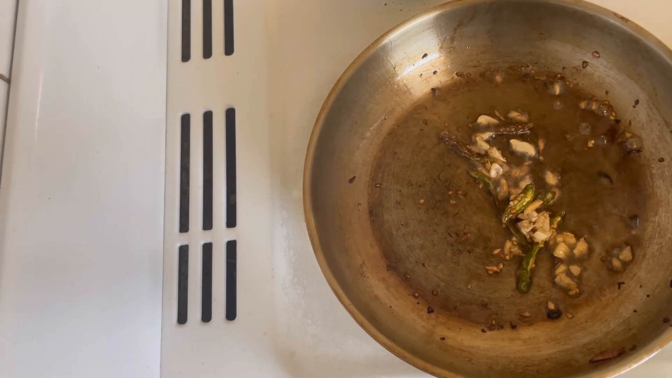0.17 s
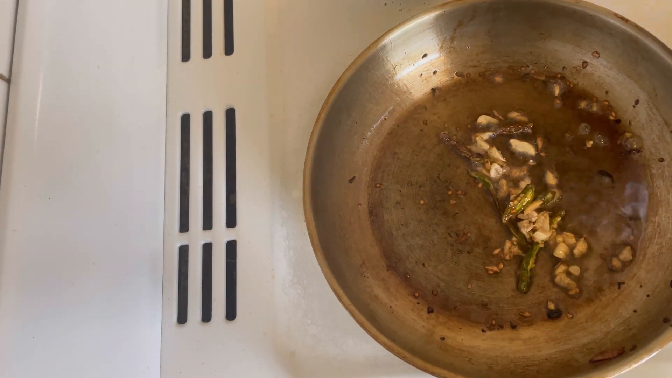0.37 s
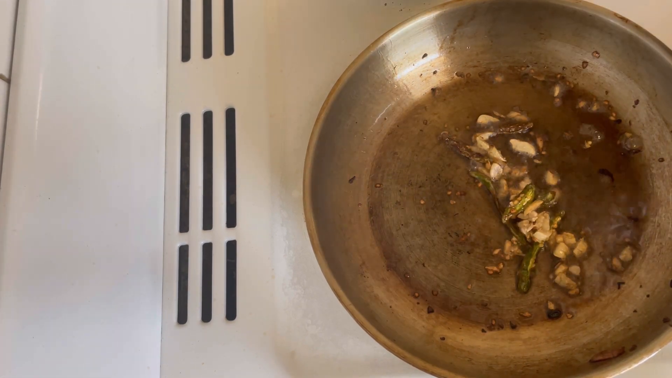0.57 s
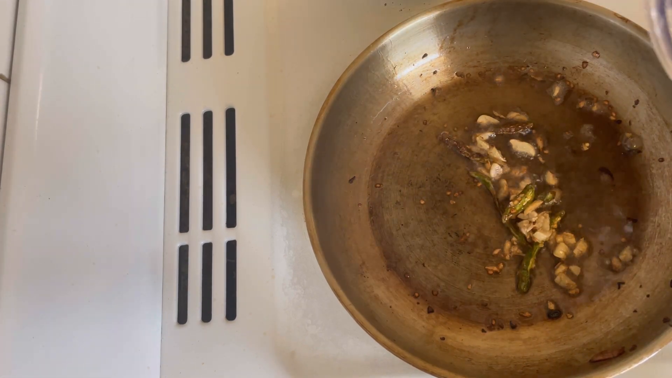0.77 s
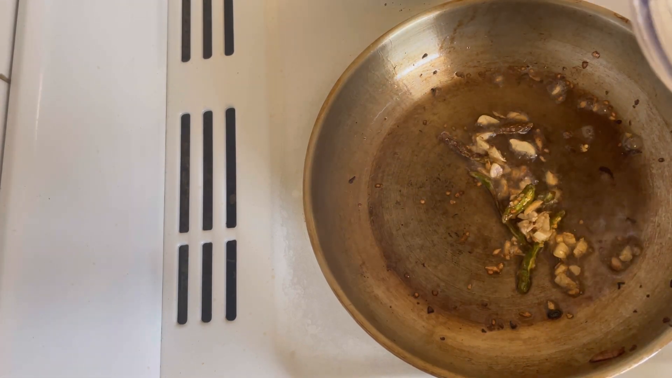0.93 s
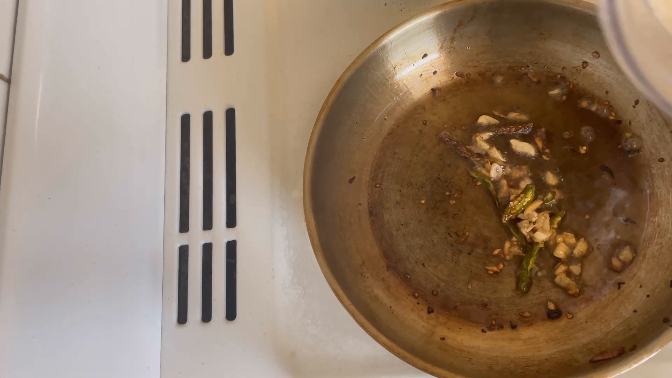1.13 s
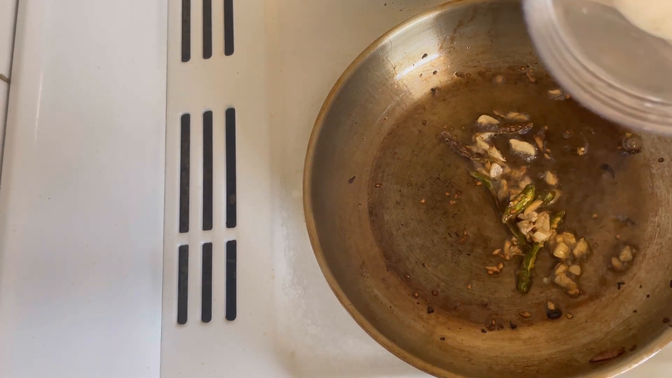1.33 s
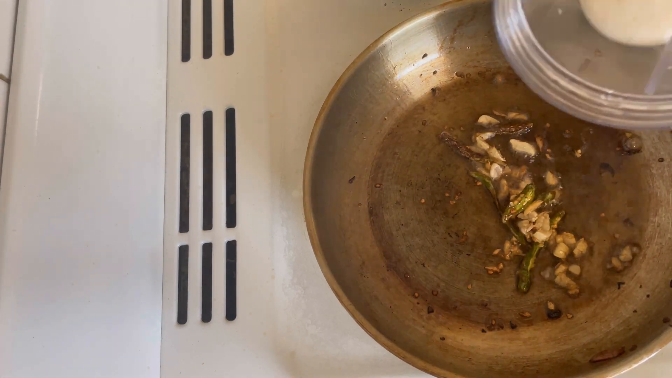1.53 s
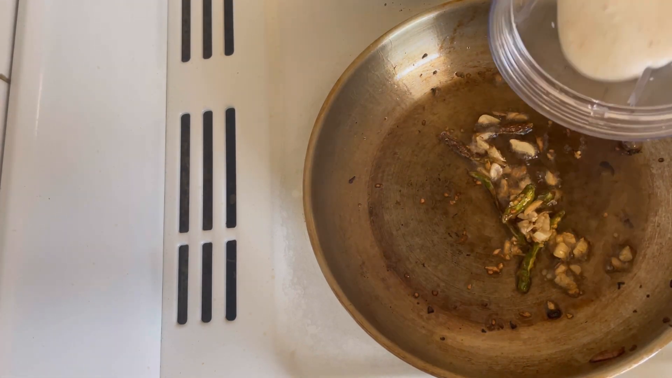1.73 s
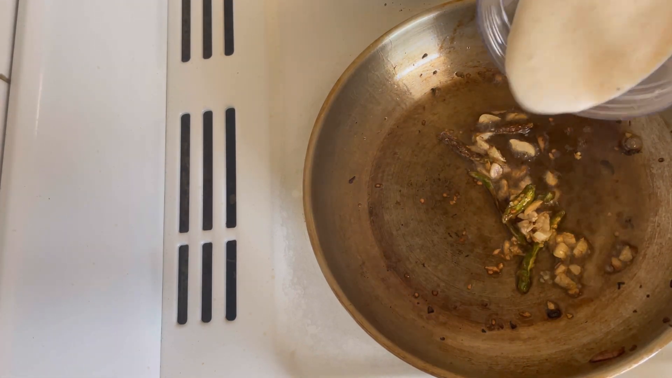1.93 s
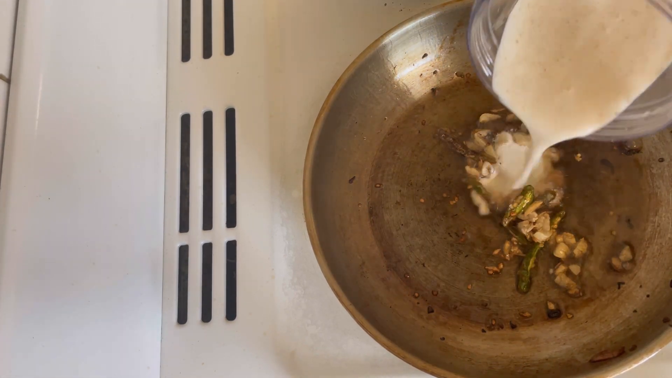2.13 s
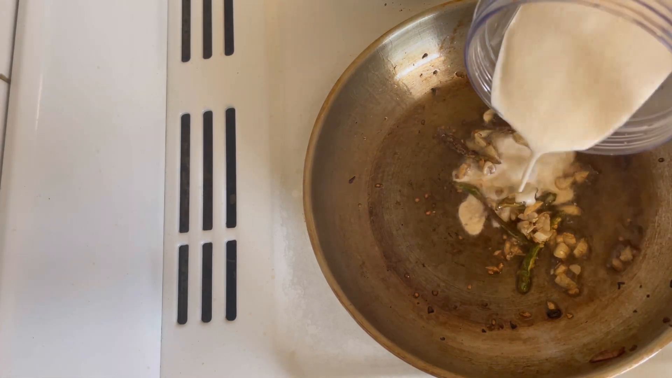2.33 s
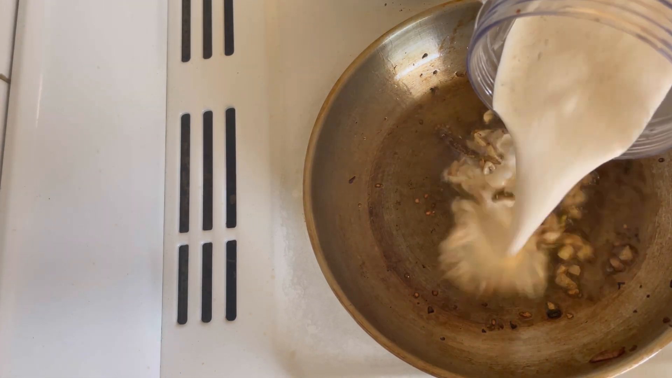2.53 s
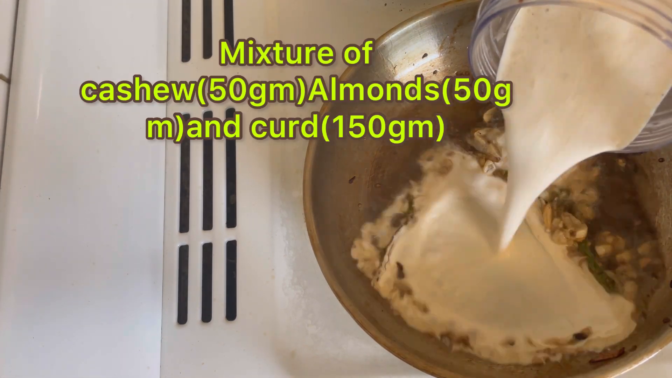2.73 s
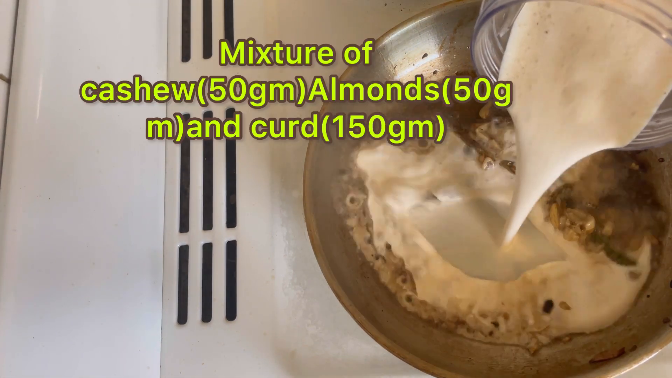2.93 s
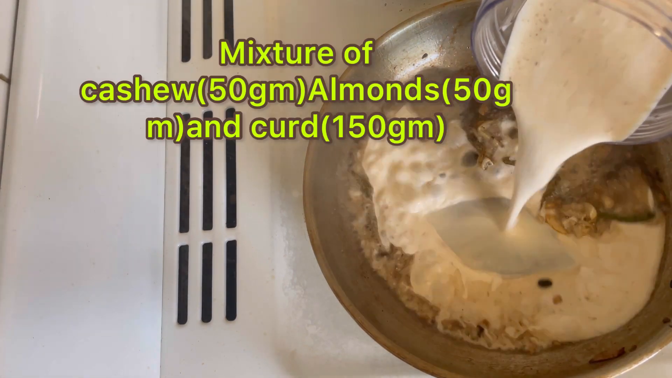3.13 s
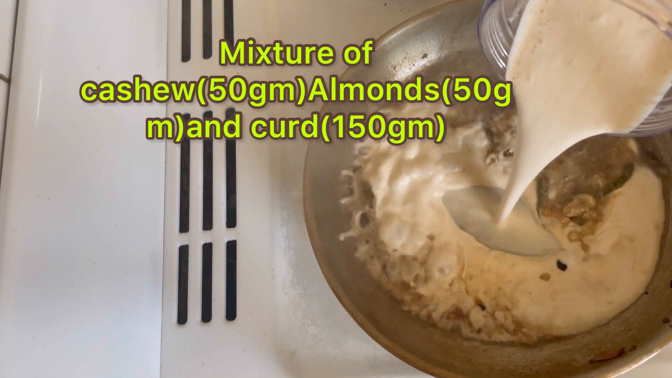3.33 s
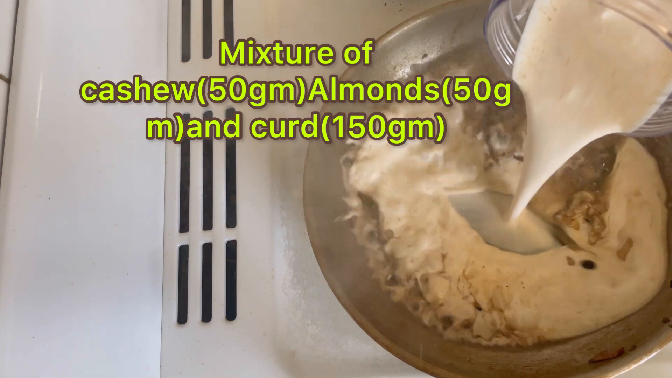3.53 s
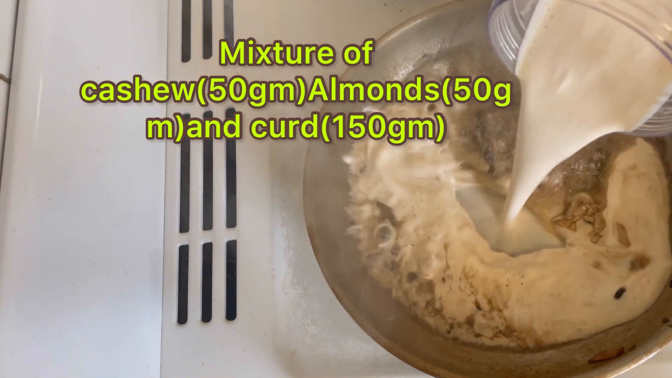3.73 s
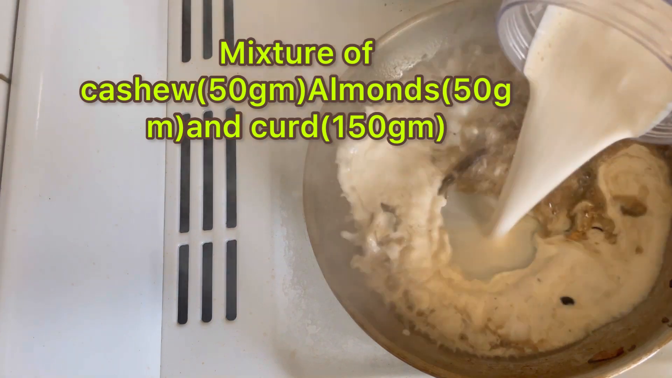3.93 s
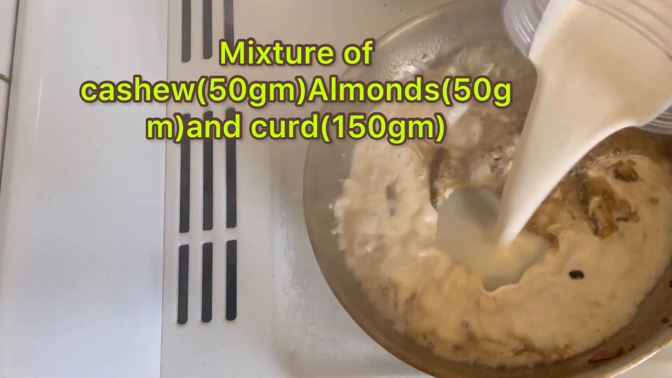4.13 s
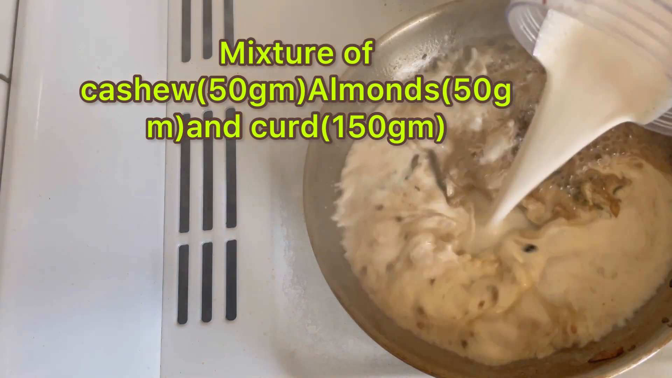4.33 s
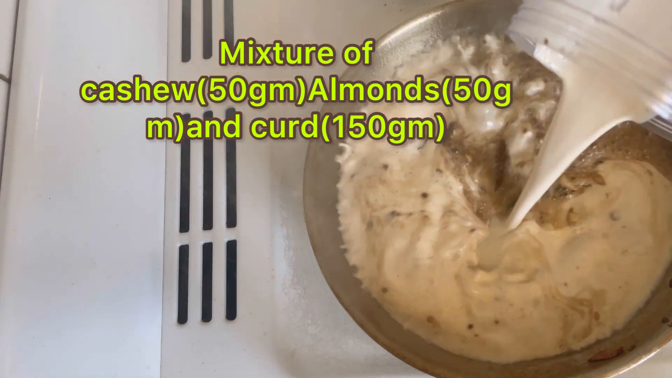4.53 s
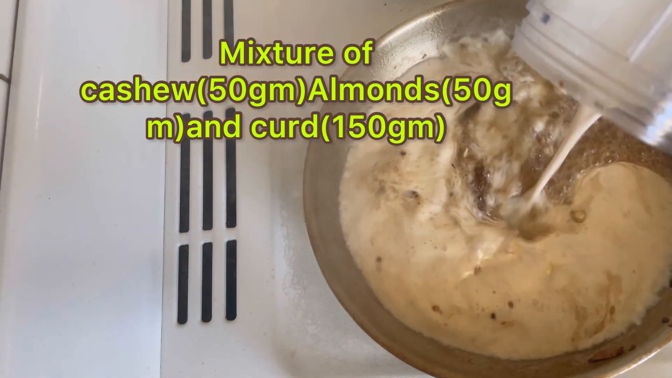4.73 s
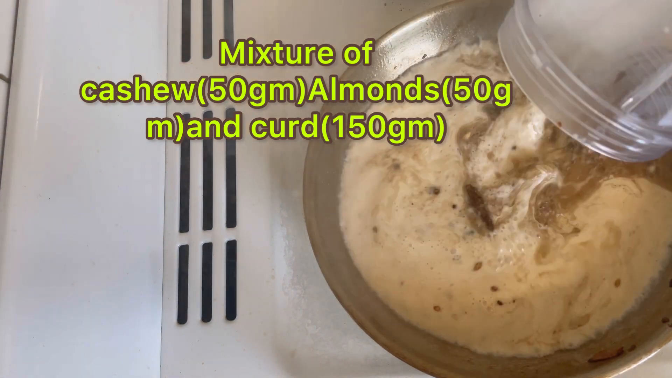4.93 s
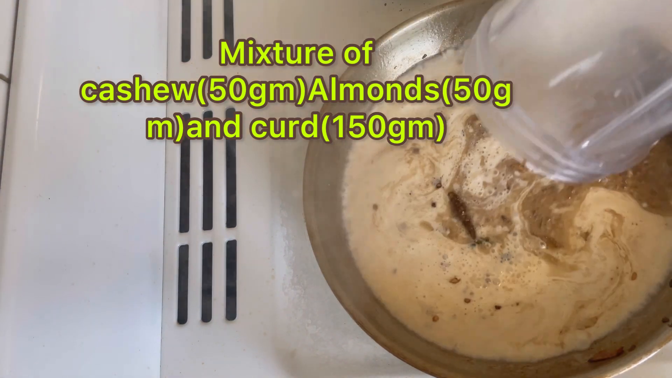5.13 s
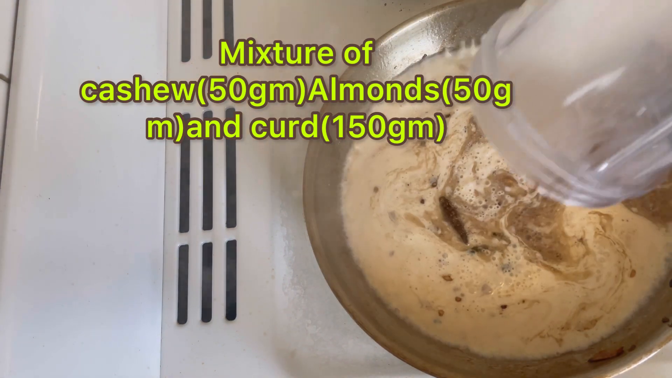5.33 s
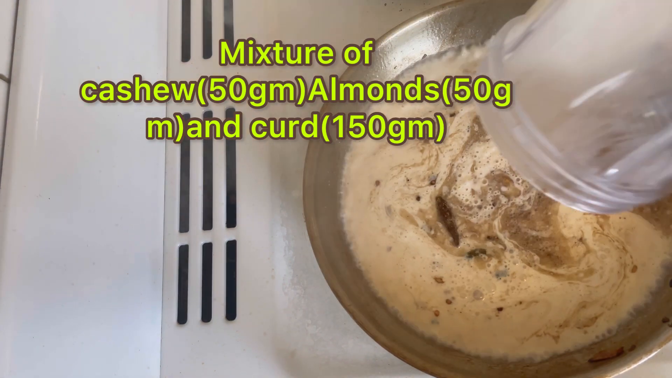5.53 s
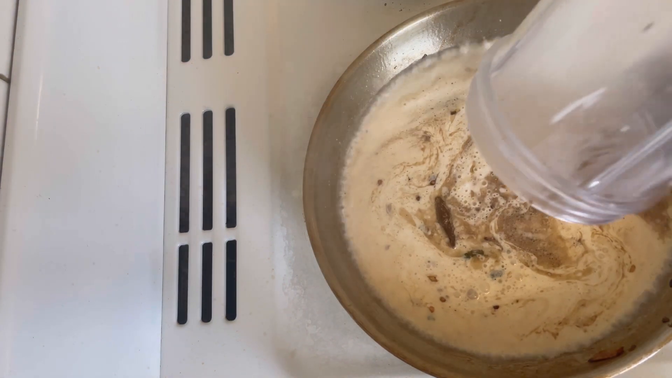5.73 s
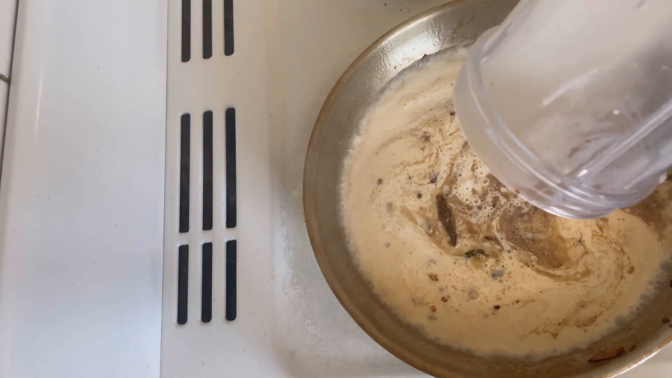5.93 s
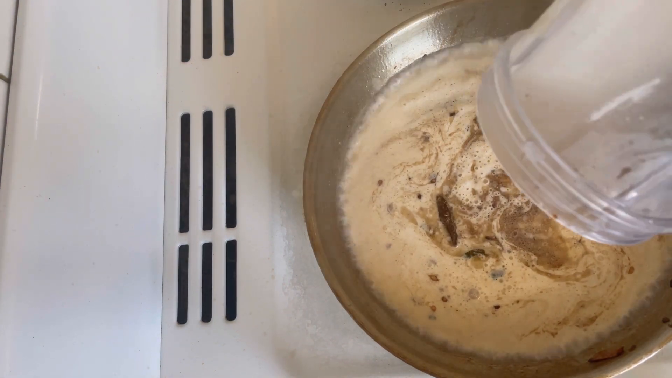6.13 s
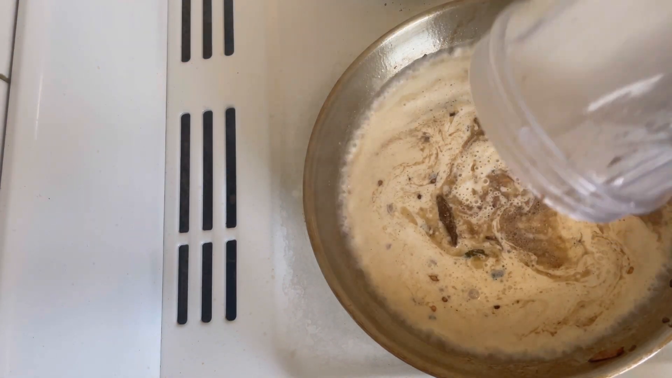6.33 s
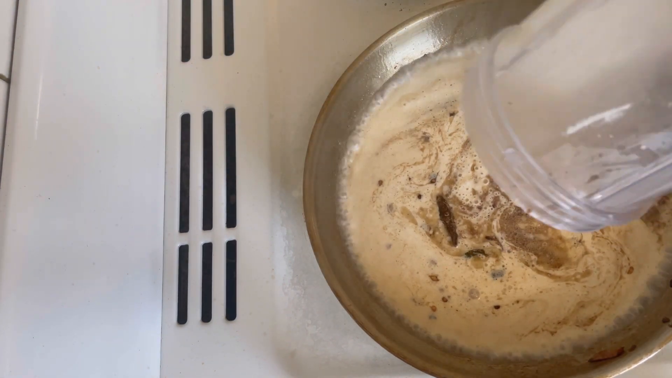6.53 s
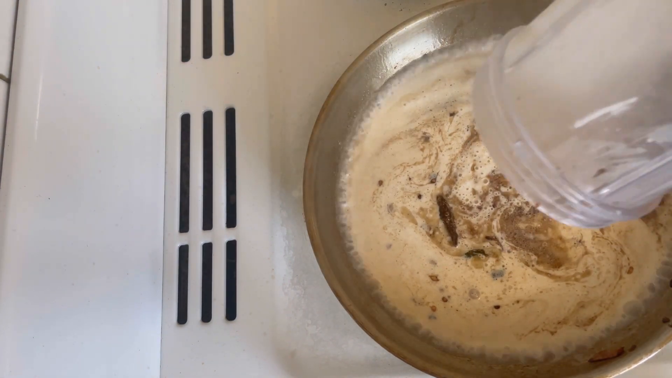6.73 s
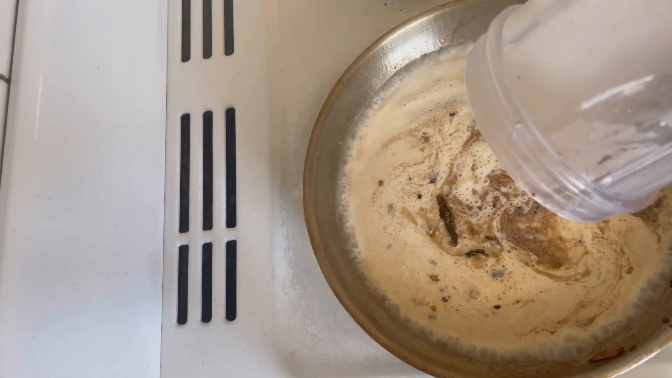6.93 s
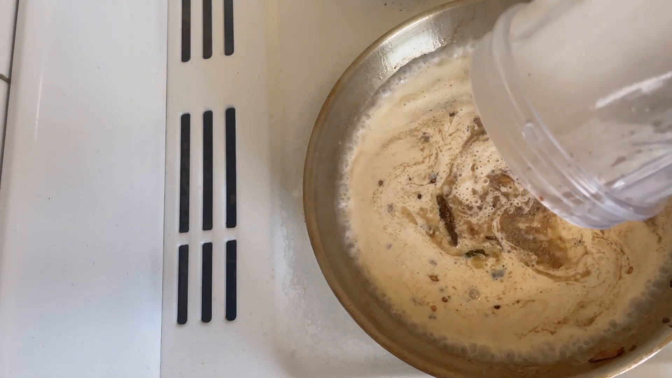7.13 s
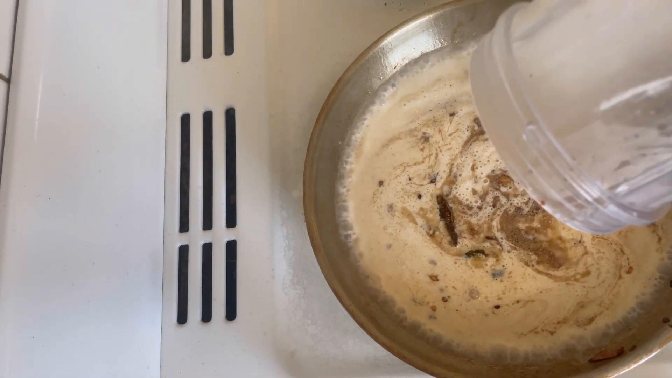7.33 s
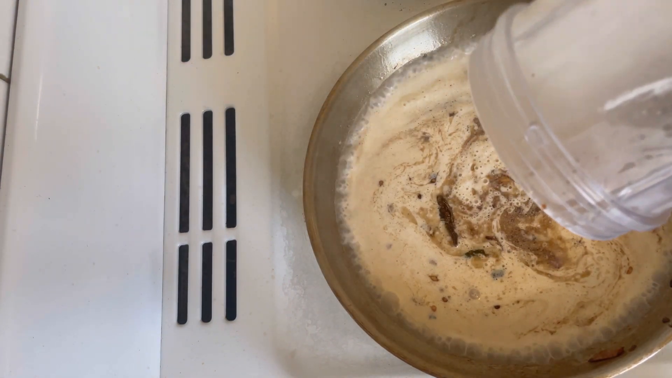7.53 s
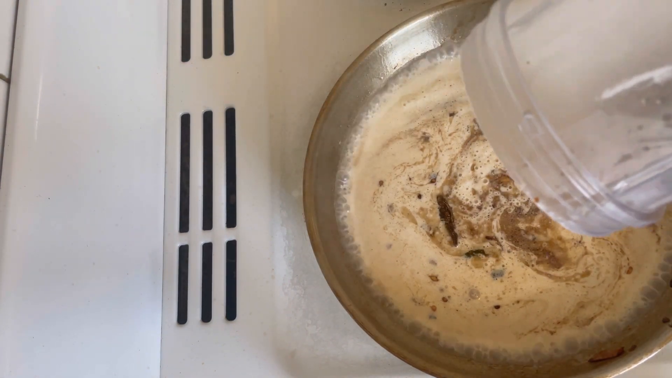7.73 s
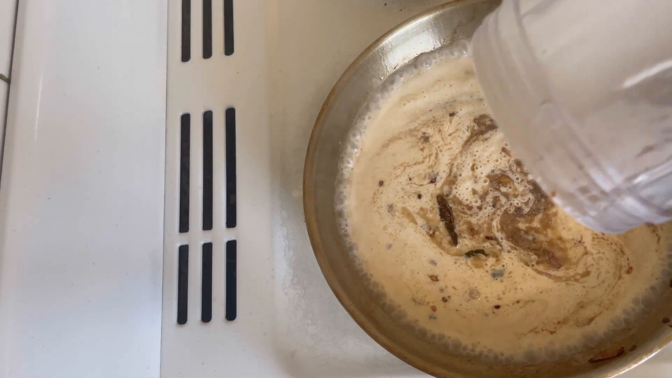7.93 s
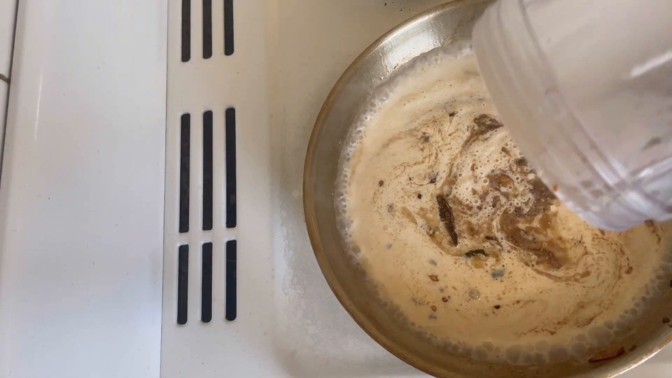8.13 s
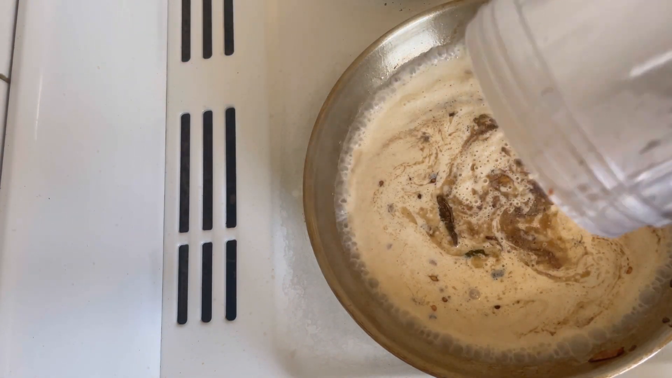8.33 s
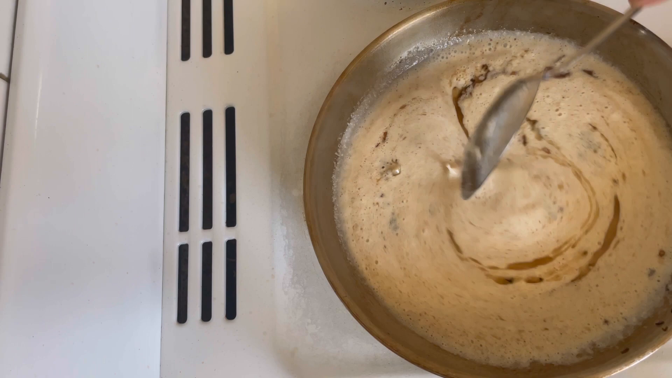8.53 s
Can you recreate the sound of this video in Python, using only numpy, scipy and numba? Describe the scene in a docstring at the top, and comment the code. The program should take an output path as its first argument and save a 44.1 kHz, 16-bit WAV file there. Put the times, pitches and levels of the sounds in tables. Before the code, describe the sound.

Close above a steel pan on a home hob, garlic and chillies fizz quietly in oil with sharp droplet pops and faint plastic jar knocks. Thick nut sauce is poured in: a loud, bright sizzle flares with sputters, squeaks and bubbling blips, then steadily sinks as the pan cools and drops suddenly to faint ticking. Stereo phone microphone, short tiled-room reflections.

```python
"""A fine fizz of garlic and chillies frying in hot oil in a steel pan, with single water droplets bursting in
it. A thick sauce is poured in from a plastic jar: steam bubbles flare into a loud sizzle that sinks as the pan
cools; then the scene changes abruptly to a faint simmer. A phone with two microphone ports is held above the
hob. Bubbles are short dying sine waves in random crowds; droplets, blisters, knocks and thuds are single placed
tones; the pan's resonances colour the crackle, and the kitchen answers with short reflections."""
import sys
import numpy as np
from scipy import signal
from scipy.fft import rfft, irfft, next_fast_len
from scipy.io import wavfile
from scipy.ndimage import uniform_filter1d
from numba import njit

SR = 44100
rng = np.random.default_rng(int(sys.argv[2]) if len(sys.argv) > 2 else 0)


def master(y):
    """Save y as 16-bit WAV."""
    cut = np.clip(np.atleast_2d(y).T, -1, 1)
    pcm = np.round(cut * 32767)  # scale
    wavfile.write(sys.argv[1], SR, pcm.astype(np.int16))


N = 378819

SAUCE_START_S, SAUCE_END_S = 2.075, 8.375
TOP_HZ = 15800  # the phone keeps nothing much above this
FFT_SIZE = next_fast_len(N + 4096, real=True)
T = np.arange(N) / SR  # time, s
FREQ = np.fft.rfftfreq(FFT_SIZE, 1 / SR)  # Hz


def undb(db):
    """Amplitude factor for a level in dB."""
    return 10 ** (np.asarray(db) / 20)


def curves(table):
    """The columns of a table, joined by straight lines in time."""
    s, *columns = np.transpose(table)
    return [np.interp(T, s, c) for c in columns]


def shape(x, gain):
    """Filter by a gain for each frequency."""
    return irfft(rfft(x, FFT_SIZE) * gain, FFT_SIZE)[..., :N]


def colour(points):
    """Gain for each frequency from (Hz, dB) points, joined along log frequency."""
    hz, db = np.transpose(points)
    return undb(np.interp(np.log(FREQ + 1), np.log(hz), db))


def band(lo_hz, hi_hz):
    """Gain of a band with soft edges."""
    low_edge = 1 + (lo_hz / (FREQ + 1)) ** 10
    high_edge = 1 + (FREQ / hi_hz) ** 10
    return 1 / np.sqrt(low_edge * high_edge)


def unit(gain):
    """Scale a gain so that it keeps the power of white noise."""
    return gain / np.sqrt(np.mean(gain ** 2))


def resonance_db(hz, width_hz, lift_db):
    """Lift in dB of one resonance, falling to half at half its width to either side."""
    return lift_db / (1 + (2 * (FREQ - hz) / width_hz) ** 2)


def pan_ring():
    """Gain of the resonances of the pan and the space over the hob."""
    # resonances: pitch_hz, width_hz, lift_db
    pan_modes = [(118, 14, 4), (208.6, 48, 7), (288, 30, 5), (425.4, 26, 5.5), (467, 17, 3.5), (610, 32, 6),
                 (682, 28, 6.5), (843, 36, 7), (1058, 16, 4), (1131, 40, 3.5), (1240, 70, 2),
                 (1420, 150, 3), (1700, 35, 2), (1890, 90, 2.5), (2130, 50, 2), (2242, 90, 4.5),
                 (2487, 50, 4.2), (2777, 110, 5.5), (2890, 60, 2.5), (3310, 50, 3.5), (3745, 130, 3),
                 (3940, 70, 2), (4348, 22, 4), (4550, 70, 2), (4990, 90, 2.5), (5099, 45, 2),
                 (5769, 90, 2.5)]
    return undb(sum(resonance_db(hz, width_hz, db) for hz, width_hz, db in pan_modes))


def hollow(fill):
    """Gain of the broad resonances of the air in the pan, which rise as it fills (0-1)."""
    # air resonances: empty_hz, full_hz, width_hz, lift_db
    air_modes = [(1090, 1420, 330, 3.5), (2680, 2830, 300, 1.5), (5040, 5380, 340, 3.5)]
    return undb(sum(resonance_db(empty_hz + fill * (full_hz - empty_hz), width_hz, db)
                    for empty_hz, full_hz, width_hz, db in air_modes))


def walk(per_s, size=N):
    """Random levels, each held briefly and smoothed; spread near 1."""
    hold = int(SR / per_s)
    steps = np.repeat(rng.standard_normal(1000), hold)[:size]
    return 1.2 * uniform_filter1d(steps, hold)


def ports(common, apart):
    """Sound from the pan reaches the ports out of step; at some pitches much of it differs at each port."""
    # the two microphone ports: pitch_hz, left_lead_rad, common_share (0-1 of the power)
    port_table = [(40, 0, .99), (220, -.1, .98), (450, -.5, .92), (740, -.6, .58), (1100, -.25, .92),
                  (1850, 0, .97), (2750, .7, .6), (4350, 1, .55), (4850, -.35, .78), (6600, 2.2, .86),
                  (7500, 3.14, .97), (9500, 4.9, .84), (11000, 6.3, .92), (12600, 7.6, .78),
                  (14300, 9.4, .93), (16000, 10.8, .7)]
    hz, lead_rad, share = np.transpose(port_table)
    share = np.clip(np.interp(FREQ, hz, share), 0, 1)
    # half the lead goes to the left port, half is taken from the right
    turn = np.exp(.5j * np.interp(FREQ, hz, lead_rad) * np.array([[1], [-1]]))
    return shape(common, np.sqrt(share) * turn) + shape(apart, np.sqrt(1 - share))


@njit
def ring(start, pole, size, length):
    """Add up short dying sine waves."""
    out = np.zeros(N)
    for k in range(len(start)):
        z = size[k] + 0j
        for i in range(start[k], min(start[k] + length[k], N)):
            z *= pole[k]
            out[i] += z.imag
    return out


def bubbles(per_s, spread_db, cycles):
    """Steam bubbles burst at random, each a dying tone at its own pitch; an even crackle near rms 1 at both ports."""
    streams = []
    for _ in range(3):  # one stream common to both ports, then one for each
        draws = rng.random((300000, 5))[:int(per_s * N / SR)]
        when, pitch, life, strength, sign = draws.T
        hz = 30 + 17500 * pitch ** 2
        # decay time in samples, at most 5 ms
        decay = np.minimum(max(cycles, .3) * (.25 + life) * SR / hz, SR / 200)
        # a positive spread makes a few bubbles far stronger, a negative one a few far weaker
        size = undb(-spread_db * np.log(strength + .004))
        # the root spreads their energy evenly over pitch
        size = size * np.sqrt(pitch / decay)
        pole = np.exp(2j * np.pi * hz / SR - 1 / decay)
        x = ring((when * N).astype(int), pole, size * np.sign(sign - .5), (4 * decay).astype(int))
        streams.append(x / x.std())
    return ports(streams[0], np.array(streams[1:]))


def bursts(table, rough, waver_hz=0):
    """Each row (s, dB, Hz, swell ms) swells and dies as a short tone, wavering in pitch and roughened by noise."""
    out = np.zeros(N + SR)
    t = np.arange(SR // 5) / SR
    for s, db, hz, swell_ms in table:
        age = t * 1000 / max(swell_ms, .02)  # 1 at the peak of the swell
        turns = np.cumsum(hz + waver_hz * walk(per_s=520, size=len(t))) / SR
        tone = np.sin(2 * np.pi * (turns - turns[0]))
        wave = tone + rough * rng.standard_normal(len(t))
        at = int(s * SR)
        out[at:at + len(t)] += undb(db) * age * np.exp(1 - age) * wave
    return out[:N]


def kitchen(x, near_db, near_t60, room_db, room_t60):
    """Quick reflections off the pan wall and the hob, then the short ring of a tiled room (t60 in s)."""
    t = np.arange(SR // 2) / SR
    tail = 0
    for db, t60 in ((near_db, near_t60), (room_db, room_t60)):
        fade = undb(-60 * t / t60) * (t > .0005)  # nothing returns in the first half millisecond
        fade = fade / np.sqrt(np.sum(fade ** 2))
        tail = tail + undb(db) * fade * rng.standard_normal((2, len(t)))
    return signal.fftconvolve(x[None], tail, axes=1)[:, :N]


def oil():
    """Moisture boils out of the garlic in a fine fizz with sparse, tiny ticks until the sauce covers it."""
    # colour of the bubbles in oil: pitch_hz, level_db
    oil_colour = [(50, -22), (100, -13.5), (160, -28), (350, -24.5), (520, -19), (700, -15), (1050, -9),
                  (1700, -8.5), (2300, -10.5), (2900, -10), (3600, -5.5), (6000, 0), (9500, -1.5),
                  (13000, -3.5), (15500, -7)]
    fizz_db, ticks_db = -43, -59
    uncovered = np.interp(T, [2.1, 2.5], [1, 0])
    fizz = bubbles(per_s=13000, spread_db=1.0, cycles=1.6)
    fizz = shape(fizz, unit(colour(oil_colour) * pan_ring() * hollow(0)))
    ticks = bubbles(per_s=260, spread_db=2.5, cycles=3.5)
    ticks = shape(ticks, unit(band(3400, 15000)))
    return (fizz * undb(fizz_db) + ticks * undb(ticks_db)) * uncovered


def rumble():
    """The low background of the kitchen: shaped noise, steady but for a 5 dB step up when the sizzle drops."""
    # colour of the rumble: pitch_hz, level_db
    rumble_colour = [(25, -32), (55, 7), (95, -4), (150, -10), (400, -23), (2000, -55)]
    noise = shape(rng.standard_normal(N), unit(colour(rumble_colour)))
    return noise * undb(np.where(T > SAUCE_END_S, -71, -76))


def spits():
    """Water droplets burst with a crack and a short ring, steam squeaks and sputters, and all echo off the pan."""
    # droplets that burst: start_s, click_db, ring_hz, ring_db, snap_hz, snap_db
    pops = [(.411, -39, 4900, -43, 11000, -22), (.4634, -38, 5400, -30, 13800, -12),
            (.4924, -31, 5140, -30, 13000, -12.5), (.5338, -35, 5790, -38, 12000, -23),
            (.6276, -33, 4950, -30, 10800, -19.5), (.645, -26, 5130, -26.5, 11400, -13),
            (.6695, -42, 5210, -38, 12000, -28), (1.066, -44, 5100, -35, 11000, -38),
            (1.171, -30, 6400, -23, 12000, -22), (1.1718, -17.5, 6000, -16.5, 12000, -18),
            (1.326, -44, 5900, -29, 11000, -38), (1.3729, -34, 6180, -29, 13500, -13.5),
            (1.5115, -48, 5200, -46, 10900, -24), (1.5503, -28, 4900, -27, 10500, -32),
            (1.5511, -24, 4400, -25, 10500, -34), (1.552, -25, 3750, -25, 10500, -34),
            (1.5562, -34, 4300, -26, 10500, -34), (1.6635, -48, 5200, -46, 11800, -24),
            (1.7256, -31, 5600, -27, 13000, -16), (1.764, -40, 5170, -32, 11000, -26),
            (1.779, -23, 5300, -17.5, 10500, -21), (1.7885, -29, 5750, -24, 13000, -13),
            (1.841, -44, 5200, -36, 11000, -38), (1.8622, -29, 5300, -22.5, 10500, -35),
            (1.8665, -34, 5900, -28, 10500, -36), (1.9875, -35, 5300, -35, 11000, -32),
            (2.8381, -14, 5110, -12, 11500, -6), (2.868, -22, 4920, -15, 11000, -16),
            (3.0116, -22, 4590, -15, 11000, -18), (3.173, -22, 5150, -15, 11000, -16),
            (3.3085, -17, 5110, -16, 12000, -7), (4.8495, -28, 5100, -25, 11000, -25),
            (5.1515, -34, 5330, -26, 11000, -28), (5.221, -34, 3990, -29, 11000, -34),
            (7.3786, -42, 5370, -36, 11000, -38), (7.8862, -42, 5360, -35, 11000, -36)]
    # steam squeaks out from under the food: start_s, level_db, pitch_hz, swell_ms
    squeak_table = [(1.078, -42, 3900, 4), (1.5524, -22, 4600, .8), (1.5605, -33, 4450, 2.5),
                    (2.333, -24, 3300, 5), (2.355, -29.5, 3345, 8), (2.378, -27, 3350, 4),
                    (3.232, -24, 2800, 5), (3.262, -24, 2650, 8), (3.998, -27, 2230, 2.5)]
    # trapped steam sputters out at the edge of the sauce: start_s, level_db, pitch_hz, swell_ms
    sputter_table = [(2.106, -32, 5200, 1.2), (2.122, -27, 4200, 2), (2.137, -27, 5200, 1.5),
                     (2.2, -25, 5000, 1), (2.249, -22, 5000, 4), (2.32, -22, 4300, 1.6),
                     (2.385, -20.5, 4600, 2.4), (2.441, -21, 4550, 1.5), (2.484, -21, 4600, 2),
                     (2.517, -19.5, 4400, 1.3), (2.611, -19.5, 4260, 1.4), (2.638, -19, 5120, 1),
                     (2.668, -18.5, 4630, 1.6), (2.703, -16.5, 5090, 3), (2.8, -18, 5100, 2.2)]
    snap_ms, ring_ms = .08, .33  # swell time of a snap, and of a ring at 6 kHz
    # smaller droplets ring higher and more briefly
    drops = [(s, db, hz, ring_ms * (6000 / hz) ** 1.5) for s, _, hz, db, *_ in pops]
    # the oil film tears within a fraction of a millisecond: a click and a bright snap
    clicks = bursts([(s, db, 4200, .032) for s, db, *_ in pops], rough=0)
    snaps = bursts([(s, db, hz, snap_ms) for s, *_, hz, db in pops], rough=.2)
    # a puff of spray follows, lower in pitch, and longer after a bigger droplet
    puffs = [(s, db - 12.5, hz * .88, ms * 3.5) for s, db, hz, ms in drops]
    spray = bursts(puffs, rough=.45, waver_hz=900)
    rings = bursts(drops, rough=.14, waver_hz=220)
    squeaks = bursts(squeak_table, rough=.1, waver_hz=70)
    # a sputter is a ragged rush of steam, with no clear pitch
    sputters = shape(bursts(sputter_table, rough=1.6, waver_hz=600), band(3300, 6200))
    close = shape(rings + clicks + snaps + spray + squeaks + sputters, band(1200, 20000))
    echo = kitchen(close, near_db=-9.5, near_t60=0.06, room_db=-14, room_t60=0.22)
    return ports(close, np.zeros((2, N))) + echo


def jar():
    """Hollow knocks of the jar, deep thuds and plops, long enough in wavelength to reach both ports alike."""
    # the plastic jar knocks in the hand: start_s, level_db, tilt_db_per_octave (about 500 Hz)
    knock_table = [(1.215, -52, 7), (1.301, -52.5, 9), (1.735, -41, 1.5), (1.785, -51, 5)]
    # what the jar rings with: pitch_hz, level_db (relative to the knock), swell_ms
    jar_modes = [(125, -9, 7), (236, -4, 15), (462, -8, 5), (592, -3, 5.2)]
    # dull thuds, and plops of sauce: start_s, level_db, pitch_hz
    thud_table = [(.468, -49, 108), (.5, -48, 98), (.55, -54, 118), (.645, -54, 110), (1.305, -57, 85),
                  (1.81, -58, 62), (2.07, -34, 1015), (2.072, -52, 120), (2.073, -53, 280), (2.53, -42, 88),
                  (2.795, -43, 80)]
    thud_cycles = 1.1  # a thud swells for this many cycles
    knocks = [(s, db + mode_db + tilt * np.log2(hz / 500), hz, ms)
              for s, db, tilt in knock_table for hz, mode_db, ms in jar_modes]
    thuds = [(s, db, hz, 1000 * thud_cycles / hz) for s, db, hz in thud_table]
    # each contact also has a faint, rough thump
    thumps = shape(bursts(knocks + thuds, rough=9.0), band(90, 560)) * undb(-12)
    bumps = shape(bursts(knocks + thuds, rough=0), band(40, 3000)) + thumps
    echo = kitchen(bumps, near_db=-18, near_t60=.05, room_db=-10, room_t60=.24)[0]
    return undb(-6.0) * (bumps + echo)  # the whole layer sits 6 dB below its tables


def spatter(boil_db):
    """Sparse, hard snaps of sauce flung about in the oil; they die away faster than the boil."""
    offset_db, slope = 4.5, 1.72  # level at a boil of 0 dB; dB of spatter per dB of boil
    snaps = bubbles(per_s=490, spread_db=-1.5, cycles=1.6)
    snaps = shape(snaps, unit(band(3300, 17500) * pan_ring() * hollow(0.46)))
    wetted = np.interp(T, [SAUCE_START_S, 2.25], [0, 1])
    return snaps * undb(offset_db + slope * boil_db) * wetted


def blisters(boil_db):
    """Big blisters of steam burst with a short, ragged blip; smaller ones gurgle at random while the sauce spreads."""
    # big blisters: start_s, level_db (before gain and tilt), pitch_hz
    blister_table = [(2.134, -33, 3160), (2.218, -17, 1150), (2.334, -31, 1080), (2.442, -24, 1250),
                     (2.48, -19, 1300), (2.573, -31, 1110), (2.648, -22, 1100), (2.702, -13, 1400),
                     (2.748, -10, 3050), (2.786, -14, 2450), (2.835, -14, 3170), (2.94, -12, 2574),
                     (3.049, -24, 1110), (3.097, -17, 2180), (3.14, -11, 2530), (3.19, -11, 2710),
                     (3.233, -8.5, 2820), (3.27, -10, 2440), (3.306, -17, 2300), (3.357, -19, 2830),
                     (3.476, -16, 1200), (3.577, -23, 1210), (3.615, -26, 1400), (3.727, -19, 1140),
                     (3.834, -14, 1280), (4.003, -22, 1340)]
    gain_db, tilt_db = -12, 1.5  # gain at 1 kHz; per octave: tighter blisters burst more sharply
    swell_cycles = 2.8
    gurgle_db = -15  # relative to the boil
    rows = [(s, db + gain_db + tilt_db * np.log2(hz / 1000), hz, 1000 * swell_cycles / hz)
            for s, db, hz in blister_table]
    blips = shape(bursts(rows, rough=0.13, waver_hz=158), band(600, 4500))
    echo = kitchen(blips, near_db=-9.5, near_t60=.06, room_db=-14, room_t60=.22)
    spreading = np.interp(T, [2.13, 2.55, 2.6, 4.2, 5.5], [0, .5, 1, 1, 0])
    gurgle = bubbles(per_s=420, spread_db=.5, cycles=9)
    gurgle = shape(gurgle, unit(band(850, 4200) * pan_ring()))
    return blips + echo + gurgle * undb(boil_db + gurgle_db) * spreading


def flares(pitch_hz):
    """Lift in dB that the spurts of steam give to bubbles of one pitch; each swells and dies away."""
    # spurts of steam as the sauce slops onto bare steel: start_s, lift_db, pitch_hz, swell_ms
    flare_table = [(2.243, 7, 6000, 8), (2.277, 6.5, 11000, 7), (2.32, 3, 2200, 12), (2.41, 3, 5600, 10),
                   (2.46, 4, 2400, 14), (2.535, 4.5, 800, 30), (2.57, 4, 1500, 14), (2.65, 4, 1100, 25),
                   (2.675, 2.5, 3000, 20), (2.78, 4, 1800, 13), (2.83, 5, 1200, 5), (2.96, 2, 3500, 30),
                   (3.07, 2.5, 1500, 20), (3.205, 3, 2400, 30), (3.32, 2, 1000, 25), (3.45, 3.5, 1700, 14),
                   (3.69, 2, 2300, 18), (3.92, 2.5, 1200, 25), (4.15, 2, 1800, 30), (4.53, 4.5, 11000, 28)]
    spread_octaves = 0.82  # spread of bubble pitch in one spurt
    lift = 0
    for s, db, hz, swell_ms in flare_table:
        age = np.maximum(T - s, 0) * 1000 / swell_ms
        nearness = 1 / (1 + (np.log2(pitch_hz / hz) / spread_octaves) ** 2)
        lift = lift + db * age * np.exp(1 - age) * nearness
    return lift


def sauce():
    """Water flashes to steam under the sauce: fine fizz first, then larger bubbles as the layer deepens and cools."""
    # colour of the bubbles in sauce: pitch_hz, level_db
    sauce_colour = [(50, -23), (100, -13), (160, -17.5), (350, -14), (650, -12.5), (1000, -5.5), (1700, -2),
                    (2900, -0.5), (4000, 0), (5000, 1), (6000, 2), (7500, -7), (9500, 0.5), (12000, -4.5),
                    (13500, -7), (15500, -5)]
    # how hard the sauce boils, flaring on the hot steel and sinking as the pan cools: start_s, level_db
    boil_table = [(2.11, -26), (2.14, -26), (2.21, -26), (2.26, -26), (2.3, -25.5), (2.65, -22.5),
                  (2.68, -22.5), (2.91, -23), (3.31, -23), (3.48, -25), (3.59, -27), (3.92, -30),
                  (6.84, -44), (7.7, -45), (8.25, -46), (8.36, -45)]
    # the stream churns the deepening pool: start_s, strength (0-1)
    churn_table = [(2.95, 0.71), (3.7, 1), (4.2, 1), (4.75, 0.72)]
    # two gushes of sauce flood the pan floor: start_s, covered_share (0-1)
    flood_table = [(2.55, 0), (2.58, 0.3), (2.64, 0.5), (2.67, 0.7)]
    # the pan fills, and cools, between these times: start_s, end_s
    filling_s = [3.3, 7.6]
    cooling_s = [3.15, 7.62]
    # size classes of steam bubbles: lowest_hz, highest_hz, level_db (relative to the boil),
    # lag_s (after first contact), build_up_s, then gains: flooded_db, churned_db, cooled_db
    size_classes = [(40, 752, -25, 0.019, 0.38, 0.5, 3, 12), (556, 1610, -13, 0.059, 0.03, -2.5, 6, 6),
                    (1680, 3600, -15, 0.048, 0.011, 9.5, 3, 5), (3500, 4450, -6, 0.018, 0.018, 4, 0.5, 1.5),
                    (4870, 8800, -1.5, 0.0094, 0.031, 0.45, 0, 2),
                    (7500, 36000, -1, 0.0084, 0.1, 0, 0.5, 2)]
    boil_db, = curves(boil_table)
    churn, = curves(churn_table)
    flooded, = curves(flood_table)
    fill = np.interp(T, filling_s, [0, 1])
    cooled = np.interp(T, cooling_s, [0, 1])
    crackle = bubbles(per_s=17000, spread_db=0.0, cycles=4.9)
    # crossfade from the hollow of the empty pan to that of the filled one
    crackle = shape(crackle, unit(hollow(0))) * (1 - fill) + shape(crackle, unit(hollow(0.84))) * fill
    body = colour(sauce_colour) * pan_ring()
    total = sum(band(lo, hi) for lo, hi, *_ in size_classes) + 0.017
    # steam escapes in uneven spurts, most of all while the sauce is still spreading
    spurt_db = np.interp(T, [2.9, 3.8], [.7, .35])
    together = .8 * walk(per_s=70)  # the part of the unevenness that all sizes share
    out = spatter(boil_db) + blisters(boil_db)
    for lo, hi, db, lag_s, build_up_s, flooded_db, churned_db, cooled_db in size_classes:
        layer = shape(crackle, unit(body * band(lo, hi)) * band(lo, hi) / total)
        number = 1 - np.exp(-np.maximum(T - SAUCE_START_S - lag_s, 0) / build_up_s)
        level_db = boil_db + db + flooded_db * flooded + churned_db * churn + cooled_db * cooled
        level_db = level_db + flares((lo + min(hi, TOP_HZ)) / 2)
        level_db = level_db + spurt_db * (together + walk(per_s=64))
        out = out + layer * number ** 0.5 * undb(level_db)  # power grows with the number of bubbles
    sounding = 1. * ((T > SAUCE_START_S) & (T < SAUCE_END_S))
    return out * uniform_filter1d(sounding, size=80)


def simmer():
    """The cooled sauce ticks faintly, a little more as a spoon moves through it."""
    # colour of the simmer: pitch_hz, level_db
    simmer_colour = [(40, 0), (100, 15), (200, 2), (700, -7), (1500, 0.5), (3000, -2.5), (5200, -0.5),
                     (10000, -3), (15500, -9)]
    ticks = bubbles(per_s=6500, spread_db=-0.5, cycles=2.2)
    level_db = np.interp(T, [8.38, 8.43, 8.53, 8.57], [-67.0, -62.0, -62.0, -58.5])
    return shape(ticks, unit(colour(simmer_colour))) * undb(level_db) * (T > SAUCE_END_S)


def scene():
    """All the sources over the hob, as they reach the two ports."""
    return oil() + sauce() + simmer() + spits() + jar() + rumble()


def record(dry):
    """The phone cuts the top with a steep low-pass."""
    low_pass = signal.ellip(10, .2, 70, TOP_HZ, fs=SR, output="sos")  # .2 dB ripple, 70 dB down
    return signal.sosfilt(low_pass, dry)


dry = scene()
out = record(dry)
master(out)
```